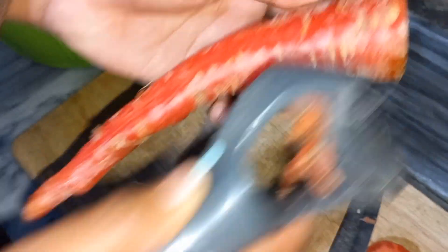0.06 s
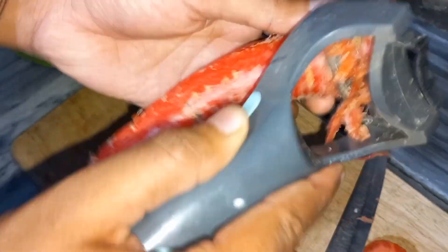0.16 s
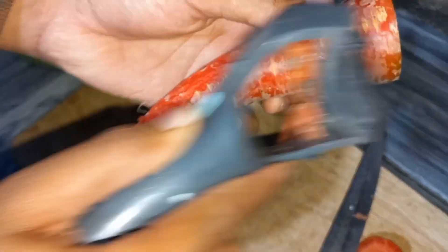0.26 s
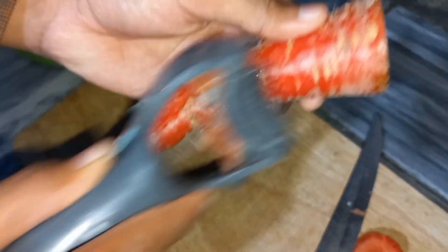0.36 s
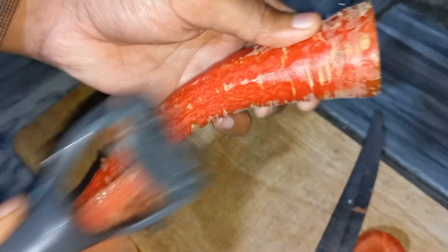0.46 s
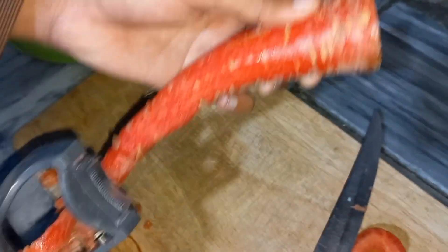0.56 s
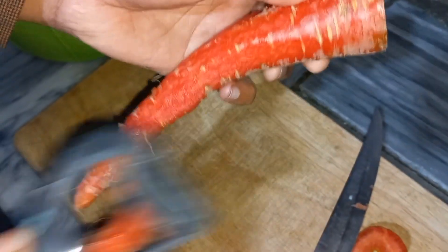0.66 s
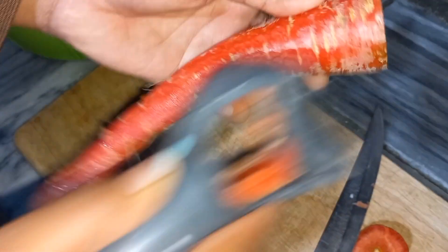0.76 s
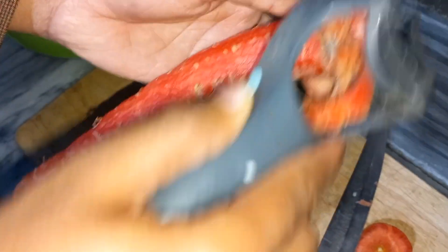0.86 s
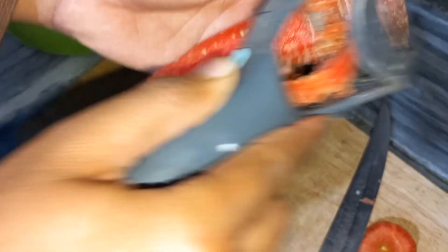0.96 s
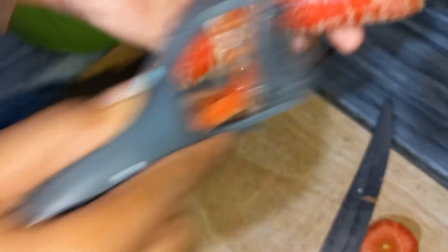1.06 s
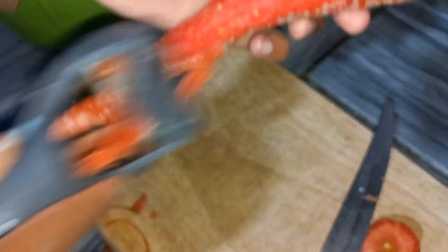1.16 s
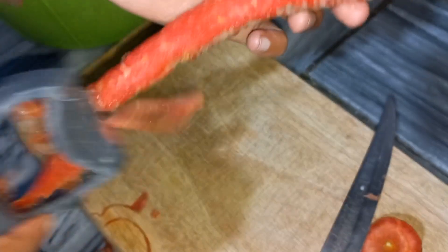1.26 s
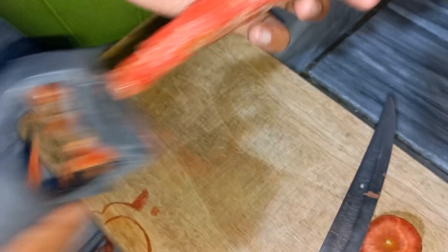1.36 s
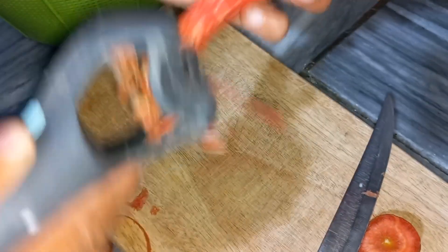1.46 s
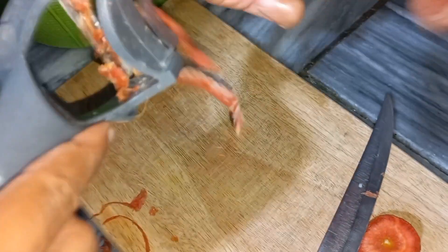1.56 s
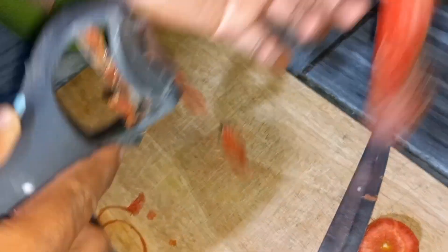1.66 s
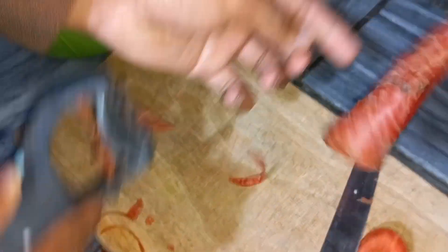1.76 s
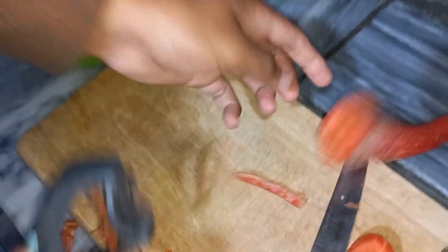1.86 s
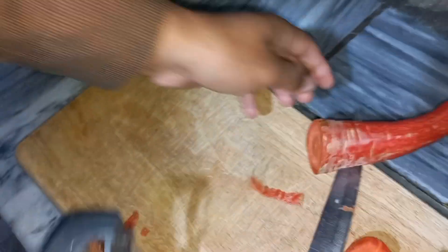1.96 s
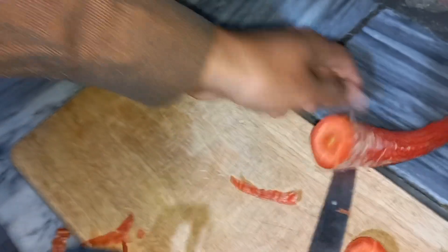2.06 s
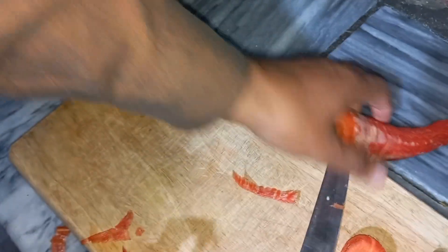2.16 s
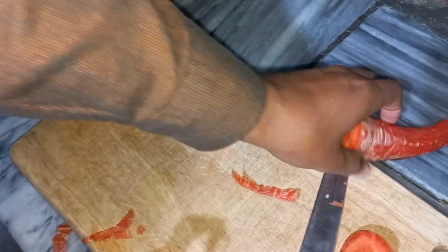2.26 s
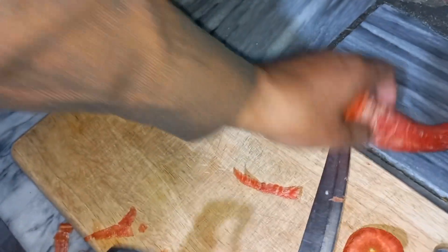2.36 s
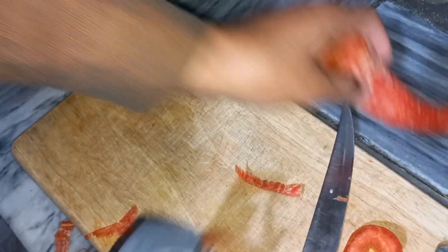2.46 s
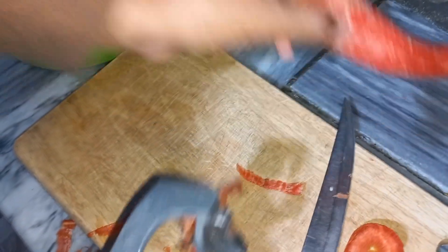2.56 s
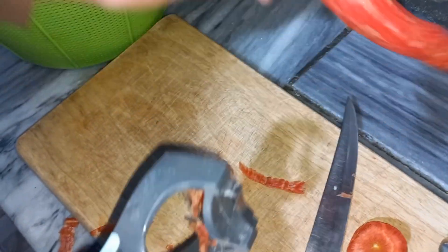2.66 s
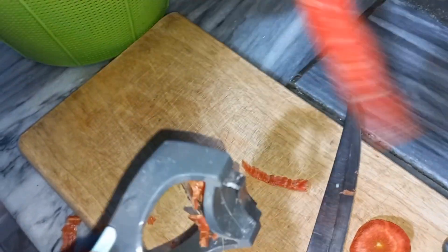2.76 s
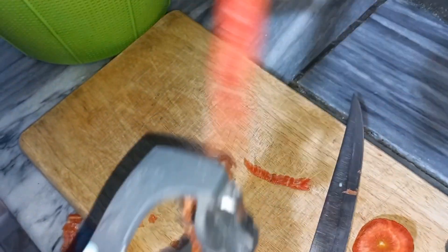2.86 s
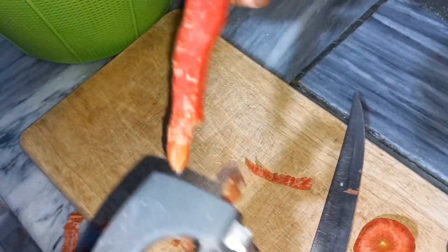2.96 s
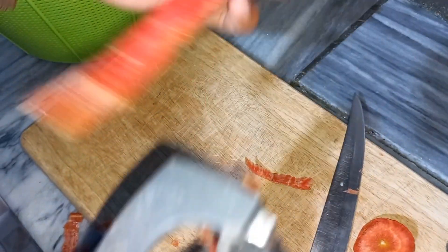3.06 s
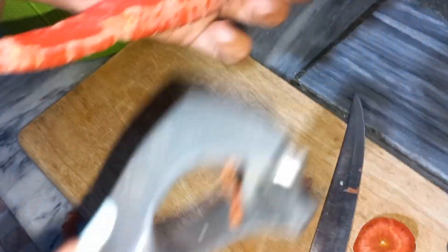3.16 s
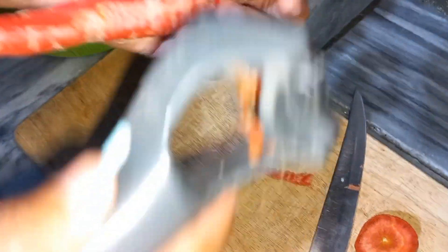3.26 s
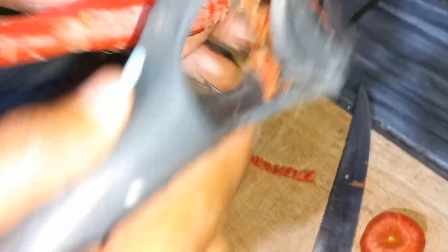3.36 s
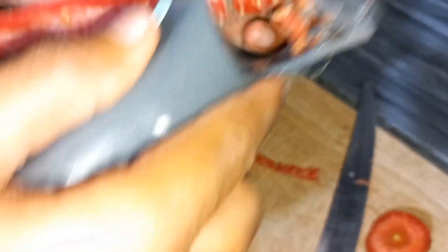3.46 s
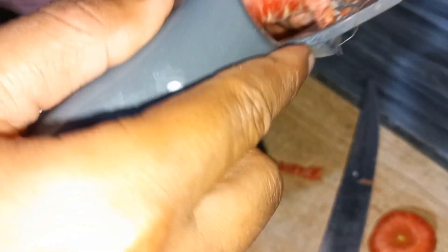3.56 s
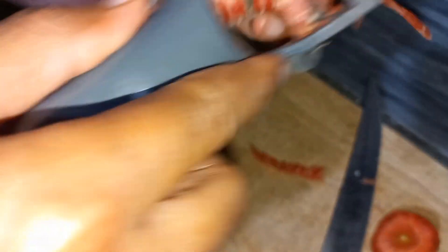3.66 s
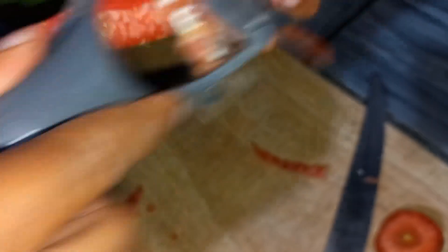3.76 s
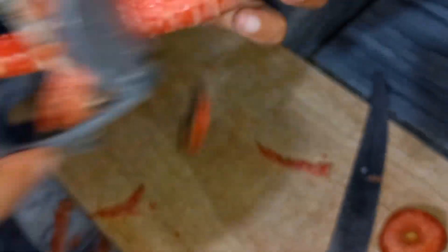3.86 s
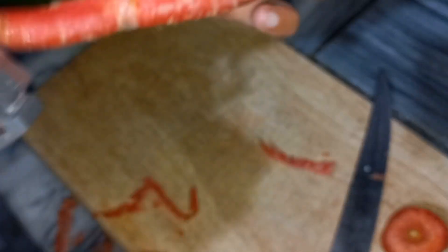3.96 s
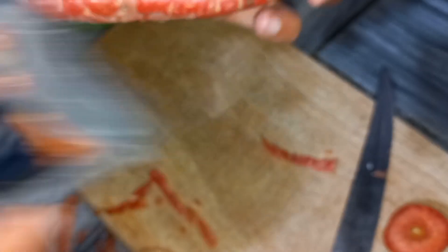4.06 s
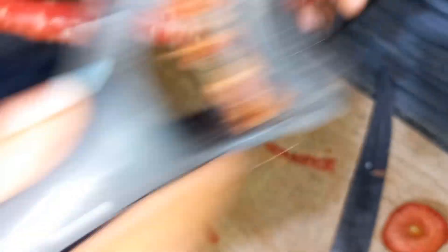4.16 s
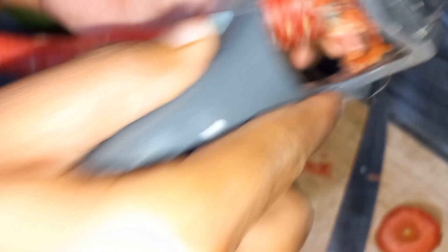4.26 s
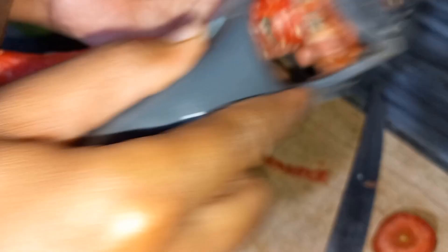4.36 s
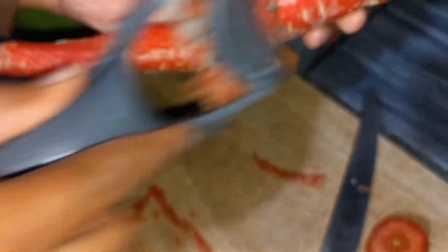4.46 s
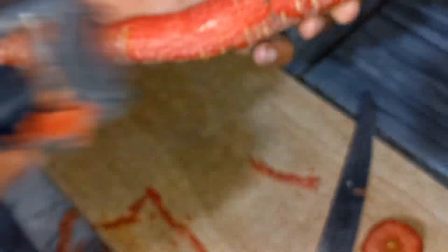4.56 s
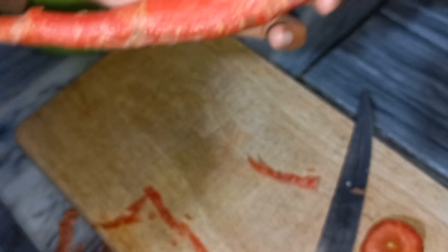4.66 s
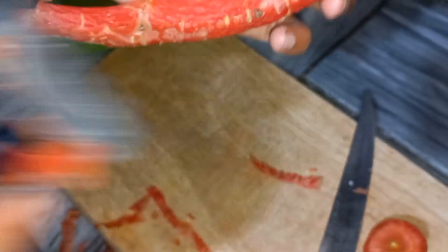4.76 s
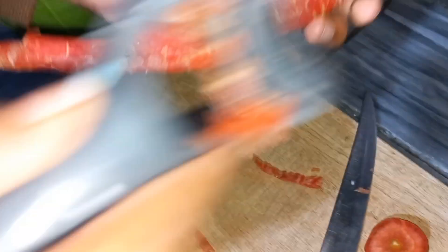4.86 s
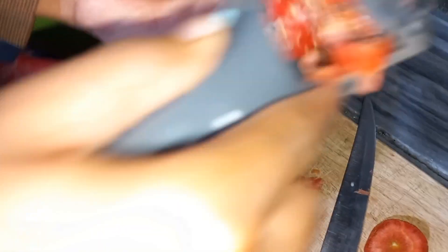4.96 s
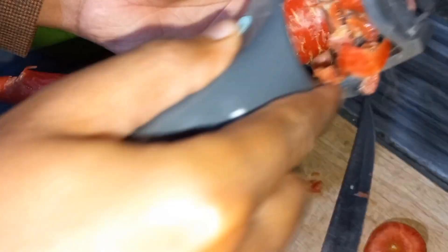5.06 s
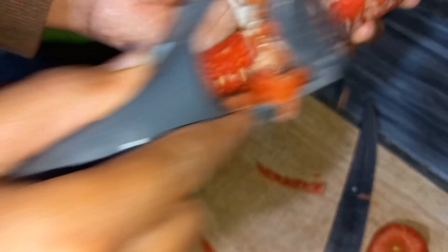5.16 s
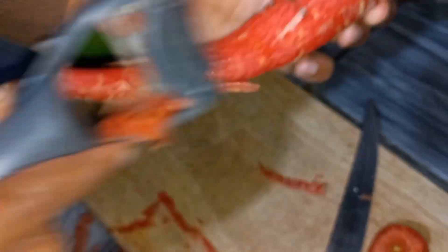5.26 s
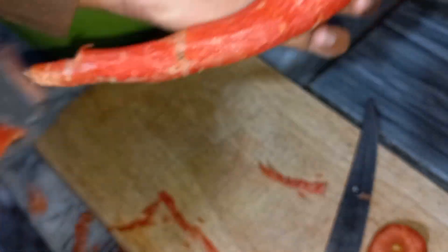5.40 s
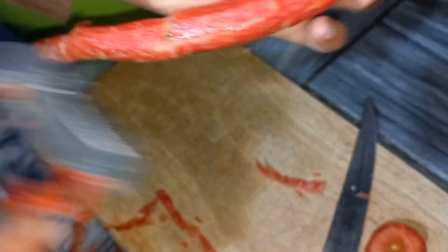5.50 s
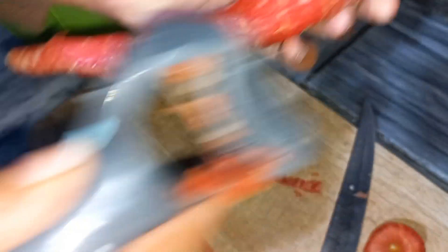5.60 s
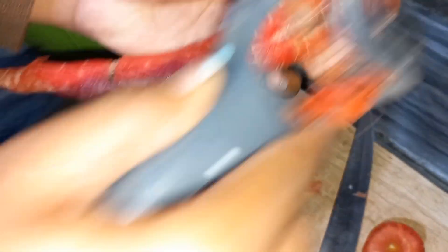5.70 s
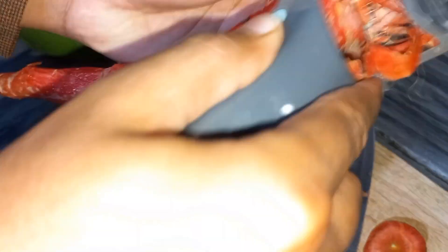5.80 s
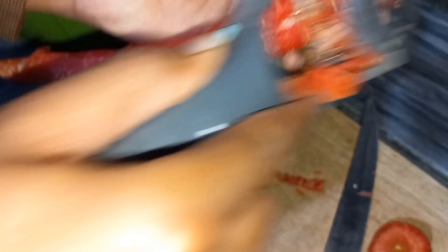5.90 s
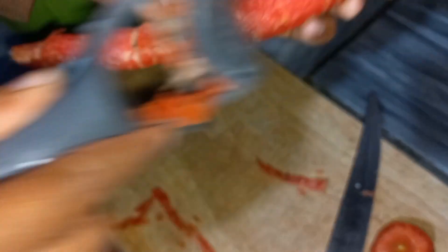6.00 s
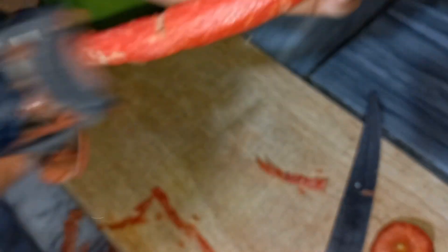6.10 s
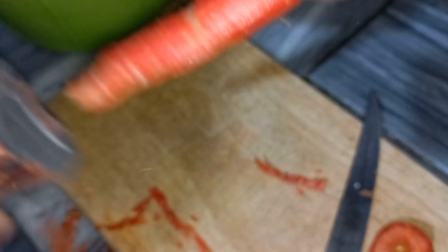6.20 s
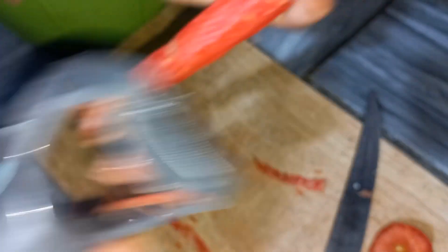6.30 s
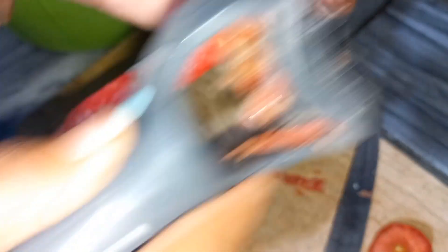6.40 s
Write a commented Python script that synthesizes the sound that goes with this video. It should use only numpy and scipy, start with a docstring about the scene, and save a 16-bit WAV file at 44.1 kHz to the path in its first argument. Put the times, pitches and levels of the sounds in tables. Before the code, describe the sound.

A plastic hand peeler works on a carrot close to the microphone in a small kitchen. Two short strokes come at about 0.2 and 0.9 seconds, each a bright, dense crunch lasting roughly a quarter second, with sharp blade clicks before and after. From 1.6 to 2.1 seconds the carrot drops and tumbles over a wooden board in a quick run of knocks and low thuds, clacking against a knife around 1.8 and 2.05 seconds. A lull follows, with a faint brush of fingers near 2.3 seconds as it is picked up. Clicks return at 3.5 seconds, and four more crunchy strokes follow at about 3.6, 4.3, 5.1 and 5.8 seconds. Soft palm rubbing and sleeve swishes accompany the movements. A light, low puff of air buffets the microphone just after 6 seconds. Faint room hum and hiss lie underneath throughout.

```python
"""Peeling a carrot

A plastic hand peeler takes six strokes along a carrot in a small kitchen. Its swivel blade lands with
a click, skates, then bites: bursting cells make a dense crunch and drive the frame's resonances.
After the second stroke the carrot slips, tumbles over a wooden board onto a knife and is picked up.
Palm and sleeve rustle, a gust buffets the microphone near the end, and the room hums and hisses."""
import sys
import numpy as np
from scipy import signal
from scipy.fft import rfft, irfft
from scipy.io import wavfile
from scipy.ndimage import uniform_filter1d

SR = 44100
rng = np.random.default_rng(int(sys.argv[2]) if len(sys.argv) > 2 else 0)


def generate_wav(sig):
    """Save sig (samples, or channels by samples) to the path in sys.argv[1] as 16-bit PCM at SR."""
    pcm = np.round(np.clip(np.atleast_2d(sig).T, -1, 1) * 32767).astype(np.int16)
    wavfile.write(sys.argv[1], SR, pcm)


N = 283871
TIME = np.arange(N) / SR

# Spectra of the sources. Each row: frequency in Hz, relative level in dB.
ROOM_SPECTRUM = [(25, -10), (60, -10.5), (110, -3), (200, -11), (400, -13.5), (900, -23.5), (1600, -26),
                 (3000, -26), (6500, -27), (8500, -37), (16000, -36.5)]
HISS_SPECTRUM = [(700, -19), (1100, -9), (1500, -4.5), (2000, -3), (2550, -6), (3200, -8.5), (4000, -8),
                 (6300, -15.5), (8000, -23), (15000, -22.5)]
BLADE_SPECTRUM = [(200, -27.5), (900, -25), (1350, -2), (1850, -6), (2300, -1), (2650, -3.5), (3200, 2),
                  (3800, -6.5), (4600, -3.5), (6200, -3.5), (8600, -16), (10800, -4.5), (13000, -16.5),
                  (15500, -4)]
CRUNCH_SPECTRUM = [(300, -45), (600, -12.5), (800, -18), (1000, -25), (1350, -14), (2900, 7.5), (3700, -6),
                   (4600, 4), (5500, -3.5), (6400, 1), (8400, -9.5), (9800, -4.5), (11200, 0),
                   (15700, -3.5)]
PALM_SPECTRUM = [(30, -16), (70, -2.5), (120, 2.5), (200, -3), (350, -0.5), (600, -3), (800, -7),
                 (1100, -9), (2000, -42), (6000, -64)]
GUST_SPECTRUM = [(25, -1.5), (50, 5), (75, 8), (130, 7), (200, -8.5), (500, -38.5)]
SLEEVE_SPECTRUM = [(30, -29), (70, -11.5), (120, -3.5), (200, 3), (350, 0.5), (600, 0.5), (800, -13.5),
                   (1100, -9.5), (2000, -35.5), (6000, -18.5), (8500, -28.5), (13000, -23.5)]
BRUSH_SPECTRUM = [(1000, -21), (2000, -7), (4000, 5.5), (6200, 9), (7500, -12), (15000, -11.5)]
KNOCK_SPECTRUM = [(60, -0.5), (250, -0.5), (500, -0.5), (3200, -6), (4500, -11.5), (6500, -12.5),
                  (8500, -24.5), (16000, -19)]
TICK_SPECTRUM = [(1500, -6), (4500, 4.5), (6500, -6), (8500, -18), (12000, -12.5), (16000, -17)]
# Spectra that excite resonances. Each row: frequency in Hz, relative level in dB.
TONE_DRIVE = [(900, -24.5), (1400, -3.5), (3100, 2.5), (4500, -20.5)]
FRAME_DRIVE = [(900, -12.5), (1350, 4), (3200, 19), (4200, -13)]
KNIFE_DRIVE = [(700, -14.5), (1500, 6.5), (4500, -2.5), (8000, -25.5)]
# Resonances. Each row: frequency in Hz, bandwidth in Hz, relative gain in dB.
HISS_MODES = [(1410, 53, 0), (1520, 50, 4.5), (1780, 33, -2.5), (2280, 110, 2), (2570, 79, 2),
              (2560, 70, -10), (2970, 56, -10)]
FRAME_MODES = [(1340, 310, 0), (1873, 170, 1), (2220, 202, 0.5), (2455, 150, -6.5), (2930, 400, -3)]
BOARD_MODES = [(300, 63, -4.5), (480, 270, -9.5), (604, 47, -5), (703, 34, -2.5), (812, 45, 4),
               (1018, 110, 2.5), (1155, 180, -3), (1290, 39, -6.5), (1460, 65, 2), (1990, 270, -9),
               (2440, 150, 2.5), (2713, 110, -3.5), (2992, 68, -11.5), (3400, 150, -14.5),
               (4020, 110, -3.5), (5500, 720, -21)]
KNIFE_MODES = [(1560, 78, -6), (2630, 190, 2.5), (2980, 200, -12), (3840, 190, -16.5)]
# Placement between the microphones. Each row: frequency in Hz, left minus right in dB.
PEELER_BALANCE = [(60, 14), (110, 6.5), (200, -3.5), (380, -1), (700, 2.5), (1290, 4.5), (1800, -0.5),
                  (2450, -6.5), (3200, 0), (4400, -2.5), (8120, -0.5), (15000, 0)]
BOARD_BALANCE = [(60, 1), (110, -1), (200, 3), (380, 1), (700, 0.5), (1290, 1), (2000, -1.5), (2750, -8),
                 (4400, -4.5), (8120, 2), (15000, -7.5)]
# Hum and hiss swell and sink. Each row: time in seconds, relative level in dB.
HUM_LEVELS = [(0, -72), (2.9, -79.5), (3.25, -65), (4.55, -62.5), (4.85, -75), (5.65, -63), (6.44, -95)]
HISS_LEVELS = [(0, -52.5), (1.3, -53), (1.58, -45.5), (2.3, -52.5), (2.85, -59), (3.08, -73), (3.42, -56.5),
               (4.1, -50), (4.8, -67.5), (5.45, -59), (5.62, -48.5), (6.44, -52.5)]
# Faint whistles. Each row: start and end in seconds, frequency in Hz, relative level in dB.
WHISTLES = [(0, 0.055, 3044, -69), (4.669, 4.939, 1344, -81), (5.617, 5.75, 8210, -61),
            (6.2, 6.44, 2576, -79.5)]
# The blade knocks in its pivots or snaps through skin.
# Each row: start in seconds, relative level in dB, treble share in dB, ring frequency in Hz.
CLICKS = [(0.0736, -15, -6.5, 2250), (0.4315, -22, -25.5, 1930), (0.5296, -33.5, -10, 3200),
          (0.8165, -16, -3.5, 3000), (1.1409, -16, -7, 2080), (1.2194, -25, -15, 3560),
          (1.421, -39.5, -12, 2180), (1.4882, -31.5, -10, 2150), (3.462, -29.5, -5, 2740),
          (3.4716, -25.5, -19, 2300), (3.652, -19.5, -6, 2240), (3.852, -15.5, -2.5, 2100),
          (3.8793, -28, -10, 2910), (4.028, -39.5, -35, 2700), (4.2243, -12, -2.5, 3310),
          (4.5163, -19.5, -2, 2150), (4.539, -27.5, -2.5, 2200), (4.9449, -16, -3.5, 1370),
          (5.1186, -9.5, 3, 2230), (5.2886, -23, -6, 2150), (5.6995, -15, -6.5, 3350),
          (5.7797, -16, -15, 2000), (6.01, -17, -5, 2840)]
# Peeler strokes. Each row: bite and exit in seconds, then relative levels in dB of the skating,
# the crunch, the frame's ring, the rub in the palm and the top frame mode.
STROKES = [(0.195, 0.445, -21, -34.5, -32.5, -58, -5), (0.925, 1.135, -25, -33.5, -31.5, -59, -1),
           (3.640, 3.840, -19.5, -35, -32, -47.5, -5), (4.320, 4.505, -22, -34.5, -31, -53.5, -7),
           (5.050, 5.255, -15, -35.5, -30.5, -50.5, -9), (5.800, 5.995, -35, -34.5, -30.5, -53.5, -5)]
# Arm swings. Each row: peak time, swell and fade in seconds, level in dB.
SWISHES = [(0.85, 0.14, 0.17, -66.5), (1.282, 0.06, .11, -49), (3.36, 0.096, 0.13, -64),
           (3.978, 0.022, 0.17, -56.5), (5.611, 0.14, 0.2, -54.5), (6.22, 0.28, .15, -61)]
# Finger touches. Each row: peak time and half-width in seconds, level in dB.
BRUSHES = [(1.454, 0.071, -66), (2.293, 0.048, -65)]
# The carrot hits the board.
# Each row: start in seconds, relative level in dB, treble share in dB, left minus right in dB.
KNOCKS = [(1.620, -22.5, -5.5, 4), (1.63, -26.5, -14, -7), (1.677, -12.5, -9.5, -2),
          (1.705, -18.5, -10, -4.5), (1.73, -21.5, -16.5, 4.5), (1.777, -22, -13.5, 0.5),
          (1.797, -25.5, -29.5, -5.5), (1.808, -12, -2, 0.5), (1.819, -25.5, -5.5, -6.5),
          (1.831, -24.5, -6.5, 1), (1.854, -18, -13.5, -1.5), (1.879, -18.5, -19, 0.5),
          (1.899, -26, -16, 2), (1.925, -27, -12, -1), (2.001, -34, -15, 3), (2.046, -20.5, -9.5, 2),
          (2.064, -29.5, -18.5, 3.5), (2.068, -19.5, -16, -3.5)]
# Its weight lands. Each row: start in seconds, relative level in dB, pitch in Hz, 60 dB decay in seconds.
THUDS = [(1.629, -18.5, 96.7, 0.19), (1.655, -16, 112.5, 0.18), (1.664, -22, 87.6, 0.32),
         (1.807, -26.5, 113.4, 0.53), (1.829, -29, 68.8, 0.49), (2, -19.5, 482, 0.036),
         (2.014, -26, 401.5, 0.08), (2.049, -36.5, 87, 0.56), (2.07, -40, 223, 0.33)]
# Bright ticks sound and the knife is jolted. Each row: start in seconds, relative level in dB.
BRIGHT_TICKS = [(1.776, -29), (1.808, -22.5), (2.212, -56)]
KNIFE_CLACKS = [(1.809, -19), (1.926, -36.5), (2.047, -18.5), (2.071, -20.5)]


def undb(db):
    """Decibels to amplitude ratio."""
    return 10 ** (np.asarray(db) / 20)


def unit(x):
    """Normalisation to rms 1."""
    return x / np.sqrt(np.mean(x ** 2))


def envelope(rows):
    """Gain interpolated between (seconds, dB) points."""
    return undb(np.interp(TIME, *np.transpose(rows)))


def walk(rate_hz, count=N):
    """Slow random modulation with a spread near 1."""
    points = rng.standard_normal(count // 40)
    return np.interp(TIME[:count] * rate_hz, np.arange(len(points)), points)


def add(out, start_s, sound):
    """Superposition of a sound on the stereo mix."""
    start = max(int(start_s * SR), 0)
    out[:, start:start + sound.shape[1]] += sound[:, :N - start]


def cut(x, order, hz, kind):
    """Maximally flat low-pass or high-pass filter."""
    return signal.sosfilt(signal.butter(order, hz, kind, fs=SR, output="sos"), x)


def colour(x, spectrum, size=8192):
    """Minimum-phase filter with a given (Hz, dB) outline."""
    hz, db = np.transpose(spectrum)
    bins = np.maximum(np.fft.rfftfreq(size, 1 / SR), 1)
    gain = undb(np.interp(np.log(bins), np.log(hz), db))
    cepstrum = irfft(np.log(gain))
    cepstrum[1:size // 2] *= 2  # folding makes the response causal
    cepstrum[size // 2 + 1:] = 0
    response = irfft(np.exp(rfft(cepstrum)))
    return np.apply_along_axis(signal.fftconvolve, -1, x, response)[..., :x.shape[-1]]


def ring(x, modes, sway_db=0, sway_hz=10):
    """Modal response: a sum of resonators whose gains may sway."""
    out = 0
    for hz, width, db in modes:
        gain = undb(db + sway_db * walk(sway_hz, count=x.shape[-1]))
        out = out + gain * signal.lfilter(*signal.iirpeak(hz, hz / width, fs=SR), x)
    return out


def brighten(x, split_hz, share_db):
    """The energy of 10 ms at rms 1 is divided between two bands, the treble's share capped."""
    low, high = unit(cut(x, 4, split_hz, "low")), unit(cut(x, 4, split_hz, "high"))
    share = min(undb(share_db), 0.95)
    return (np.sqrt(1 - share ** 2) * low + share * high) * np.sqrt(SR / 100 / x.shape[-1])


def diffuse(t, coherent_hz, gain=1):
    """Diffuse noise at two microphones is coherent in the bass and incoherent in the treble."""
    mid, side = gain * rng.standard_normal((2, len(t)))
    side = cut(side, 1, coherent_hz, "high")
    return np.array([mid + side, mid - side])


def noise(spectrum, coherent_hz):
    """Coloured diffuse noise of rms 1."""
    return unit(colour(diffuse(TIME, coherent_hz), spectrum))


def space(x, balance, room_db, room_t60, treble_t60, split_hz=2500):
    """Reverberation decays exponentially in two bands; level differences place the source."""
    t = np.arange(SR) / SR
    field = diffuse(t, 500)
    low = cut(field, 1, split_hz, "low")
    tail = low * undb(-60 * t / room_t60) + (field - low) * undb(-60 * t / treble_t60)
    tail = unit(tail * (1 - np.exp(-t / 0.0032))) / np.sqrt(SR)
    wet = x + undb(room_db) * signal.fftconvolve(x, tail, axes=1)[:, :N]
    return np.array([colour(channel, [(hz, sign * db / 2) for hz, db in balance])
                     for channel, sign in zip(wet, (1, -1))])


def kitchen(air_db=-70, hum_hz=116, hum_width_hz=30):
    """Broadband noise gives room air and hiss; narrow bands of it waver as a hum and faint tones."""
    hum_mode = [(hum_hz, hum_width_hz, 0)]
    hum = unit(ring(ring(diffuse(TIME, 900), hum_mode), hum_mode)) * envelope(HUM_LEVELS)
    tones = unit(ring(noise(TONE_DRIVE, 900), HISS_MODES, sway_db=4.5, sway_hz=6.2))
    hiss = (undb(-12) * noise(HISS_SPECTRUM, 970) + undb(-14.5) * tones) * envelope(HISS_LEVELS)
    return noise(ROOM_SPECTRUM, 800) * undb(air_db) + hum + hiss


def whistles(width_hz=70):
    """Narrow-band noise is heard as unsteady tones, which fade in and out."""
    out = 0
    for start, end, hz, db in WHISTLES:
        elapsed = np.clip((TIME - start) / (end - start), 0, 1)
        fade = np.sqrt(np.maximum(np.sin(np.pi * elapsed), 0))
        peak = signal.iirpeak(hz, hz / width_hz, fs=SR)
        tone = signal.lfilter(*peak, signal.lfilter(*peak, rng.standard_normal((2, N))))
        out = out + fade * undb(db + 11) * unit(tone)
    return out


def blade_clicks(rise_s=0.0009, chatter_s=0.0069, ring_db=-22, ring_t60=0.11, width_hz=170, mode_db=4):
    """Impact excitation: the loose blade chatters for milliseconds, then one mode rings on briefly."""
    out, t = np.zeros((2, N)), np.arange(SR // 10) / SR
    decay = np.exp(-(t / chatter_s) ** 2) + undb(ring_db - 60 * t / ring_t60)
    shape = np.minimum(t / rise_s, 1) * decay
    for start, db, treble_db, hz in CLICKS:
        click = colour(diffuse(t, 1100) * shape, BLADE_SPECTRUM)
        click = click + ring(click, [(hz, width_hz, mode_db)])
        add(out, start, undb(db - 10) * brighten(click, 8600, treble_db))
    return space(out, PEELER_BALANCE, room_db=-10.5, room_t60=0.24, treble_t60=0.065)


def landing(bite_s):
    """Contact begins with the last click more than 50 ms before the bite."""
    return max(start for start, *_ in CLICKS if start < bite_s - 0.05)


def progress(run_out_s=0.03):
    """The peeler's position along the carrot, 0 to 1 in each stroke."""
    times = [s for bite, leave, *_ in STROKES for s in (landing(bite), leave + run_out_s)]
    return np.interp(TIME, times, [0, 1] * len(STROKES))


def stroke_gain(column, attack_s, crest_s, crest_db, sag_db_per_s, release_db_per_s, crest_width_s=0.056):
    """Amplitude follows contact force: the blade skates, bites, crests, eases and runs off."""
    out = 0
    for row in STROKES:
        bite, leave, skate_db = row[:3]
        attack = skate_db * np.clip((bite - TIME) / attack_s, 0, 1)
        from_crest = np.clip(TIME, bite, leave) - bite - crest_s
        hold = crest_db * np.exp(-(from_crest / crest_width_s) ** 2) - sag_db_per_s * np.abs(from_crest)
        release = release_db_per_s * np.maximum(TIME - leave, 0)
        out = out + undb(row[column] + attack + hold - release) * (TIME > landing(bite))
    return out


def cell_bursts(per_s=5000, spread_db=3.5, judder_db=0.5, judder_hz=166):
    """Fracture: cells burst as random impulses, in clumps as the blade sticks and slips."""
    bursting = rng.random(N) < per_s / SR
    size = undb(-spread_db * rng.standard_normal(N) - judder_db * walk(judder_hz))
    return unit(diffuse(TIME, 1200, gain=bursting * size))


def reflection(x, start_ms, end_ms, echo, wander):
    """Comb filtering: a nearby reflection shifts its notches as the peeler travels."""
    lag_ms = (start_ms + (end_ms - start_ms) * progress()) * (1 + wander * walk(3.4))
    delayed = np.array([np.interp(TIME - lag_ms / 1000, TIME, channel) for channel in x])
    return unit(x + echo * delayed)


def hollow_resonance(start_hz=539, rise_hz_per_s=45, width_hz=130):
    """A narrow noise band sings along with the cut, a little higher with every stroke."""
    phase = 2 * np.pi * np.cumsum(start_hz + rise_hz_per_s * TIME) / SR
    return unit(walk(width_hz) * np.cos(phase) + walk(width_hz) * np.sin(phase))


def crunch(bursts):
    """Direct radiation: the bursts sound bright, over a soft low resonance."""
    sound = unit(colour(bursts, CRUNCH_SPECTRUM)) + undb(-33) * hollow_resonance()
    return sound * stroke_gain(column=3, attack_s=0.091, crest_s=0.081, crest_db=0.8,
                               sag_db_per_s=12, release_db_per_s=409)


def frame_ring(bursts, shift_db=7, top_above_hz=2700):
    """Forced vibration: the bursts drive the plastic frame, its modes weighted by the changing grip."""
    drive = colour(bursts, FRAME_DRIVE)
    tilt_db = shift_db * (progress() - 0.5)  # the top mode gains towards the thin tip
    grip = envelope([(s, row[-1]) for row in STROKES for s in row[:2]])
    frame = 0
    for mode in FRAME_MODES:
        weight = grip * undb(tilt_db) if mode[0] > top_above_hz else undb(-tilt_db)
        frame = frame + weight * ring(drive, [mode], sway_db=1, sway_hz=12)
    running_rms = np.sqrt(uniform_filter1d(np.mean(frame ** 2, axis=0), size=2000))
    return frame / running_rms * stroke_gain(column=4, attack_s=0.1, crest_s=0.031, crest_db=0,
                                             sag_db_per_s=47, release_db_per_s=383)


def peeling():
    """One excitation, the bursting cells, feeds both the crunch and the frame."""
    bursts = reflection(cell_bursts(), start_ms=0.463, end_ms=0.38, echo=0.11, wander=0.095)  # fingers
    bursts = reflection(bursts, start_ms=2.17, end_ms=2.05, echo=0.4, wander=0.06)  # board
    peel = undb(4.5) * crunch(bursts) + undb(2.05) * frame_ring(bursts)
    uneven_tearing = undb(0.6 * walk(55))
    return space(peel * uneven_tearing, PEELER_BALANCE, room_db=-12, room_t60=0.38, treble_t60=0.26)


def palm_and_sleeve():
    """Friction noise: the carrot rubs in the palm, and the sleeve swishes as the arm swings back."""
    palm = noise(PALM_SPECTRUM, 570) * stroke_gain(column=5, attack_s=0.098, crest_s=0.21, crest_db=1.5,
                                                   sag_db_per_s=49.5, release_db_per_s=165.5)
    swing = sum(undb(db) / np.cosh(2 * (TIME - peak) / np.where(TIME < peak, swell, fade))
                for peak, swell, fade, db in SWISHES)
    sleeve = noise(SLEEVE_SPECTRUM, 670) * swing
    return (palm + sleeve) * undb(0.41 * walk(60))


def finger_brushes():
    """Sliding friction: fingers brush the wet carrot as it slips, and a hand brushes the board."""
    touch = sum(undb(db) * np.exp(-((TIME - peak) / width) ** 2) for peak, width, db in BRUSHES)
    return noise(BRUSH_SPECTRUM, 990) * undb(2.5 * walk(39.3)) * touch


def board_knocks(contact_s=0.0014, rattle_db=-27, rattle_t60=0.14):
    """Modal excitation depends on the point of impact, so the board's modes share each blow anew."""
    out, t = np.zeros((2, N)), np.arange(SR // 6) / SR
    force = t / contact_s * np.exp(-t / contact_s) + undb(rattle_db - 60 * t / rattle_t60)
    for start, db, treble_db, pan_db in KNOCKS:
        board = ring(diffuse(t, 2600) * force, BOARD_MODES, sway_db=0.5, sway_hz=5)
        knock = brighten(colour(board, KNOCK_SPECTRUM), 1600, treble_db)
        pan = undb([[pan_db / 2], [-pan_db / 2]])
        add(out, start, undb(db - 3.5) * pan * knock)
    return space(out, BOARD_BALANCE, room_db=-6.5, room_t60=0.34, treble_t60=0.082, split_hz=1000)


def thuds(rise_s=0.0054):
    """Damped free vibration: the carrot's weight sets board and worktop booming."""
    out, t = np.zeros((2, N)), np.arange(SR) / SR
    for start, db, hz, t60 in THUDS:
        shape = undb(db + 4 - 60 * t / t60) * (1 - np.exp(-t / rise_s))
        boom = -shape * np.sin(2 * np.pi * hz * t)
        add(out, start, boom[None])
    return space(out, BOARD_BALANCE, room_db=-11.5, room_t60=0.49, treble_t60=0.22)


def bright_ticks(t60=0.035):
    """Broadband transients: short, bright bursts of noise sound as the carrot tumbles."""
    out, t = np.zeros((2, N)), np.arange(SR // 8) / SR
    for start, db in BRIGHT_TICKS:
        burst = colour(diffuse(t, 900), TICK_SPECTRUM)
        add(out, start, unit(burst) * undb(db - 60 * t / t60))
    return space(out, BOARD_BALANCE, room_db=-2.5, room_t60=0.35, treble_t60=0.34)


def knife_clacks(contact_s=0.0016):
    """Heavy damping: the knife strikes the wood and is stilled at once by the carrot on top of it."""
    out, t = np.zeros((2, N)), np.arange(SR // 20) / SR
    force = t / contact_s * np.exp(-t / contact_s)
    for start, db in KNIFE_CLACKS:
        drive = colour(diffuse(t, 2600) * force, KNIFE_DRIVE)
        add(out, start, undb(db - 8) * unit(ring(drive, KNIFE_MODES)))
    return space(out, BOARD_BALANCE, room_db=-9, room_t60=0.27, treble_t60=0.2)


def gust(start_s=6.085, attack_s=0.069, hold_s=0.061, fade_db_per_s=93.5, level_db=-46):
    """Turbulence: moving air buffets the microphone with low-frequency pressure fluctuations."""
    age = TIME - start_s
    fade_db = fade_db_per_s * np.maximum(age - attack_s - hold_s, 0)
    shape = np.clip(age / attack_s, 0, 1) * undb(level_db - fade_db)
    return noise(GUST_SPECTRUM, 470) * shape * undb(5 * walk(32))


def scene():
    """Superposition of the dropped carrot, the peeler, the handling and the room."""
    drop = board_knocks() + knife_clacks() + bright_ticks() + thuds()
    peeler = peeling() + blade_clicks()
    handling = finger_brushes() + palm_and_sleeve() + gust()
    return drop + peeler + handling + whistles() + kitchen()


def record(dry, bass_hz=52, top_hz=16000):
    """Band limiting: the phone drops the deep bass, saturates at full scale and cuts the top."""
    limited = np.clip(cut(dry, 4, bass_hz, "high"), -1, 1)
    return signal.sosfilt(signal.ellip(10, 0.2, 80, top_hz, fs=SR, output="sos"), limited)


dry = scene()
out = record(dry)
generate_wav(out)
```